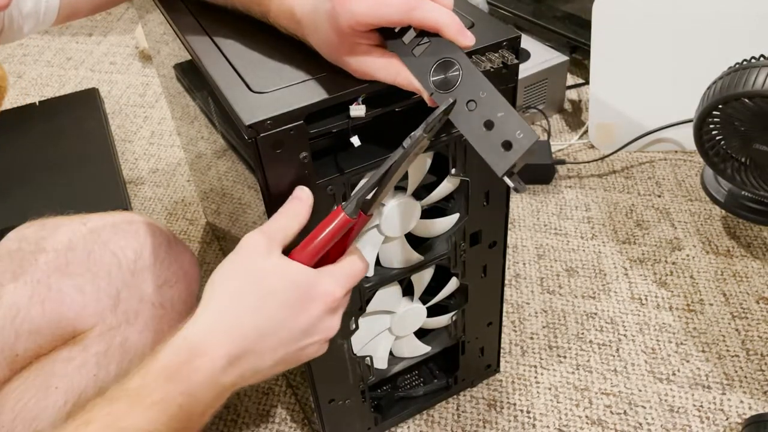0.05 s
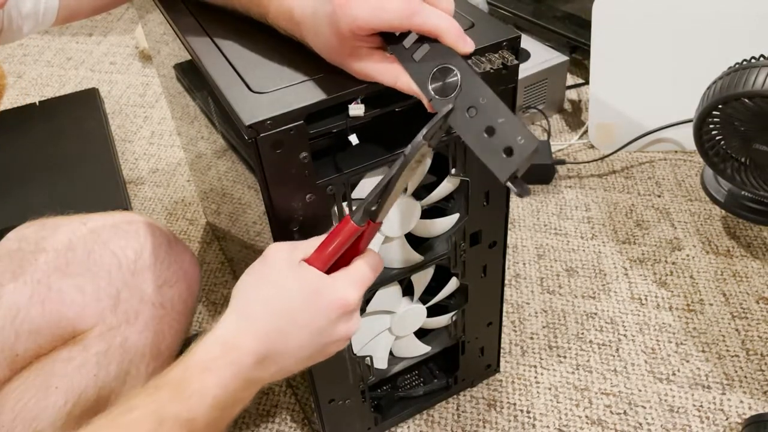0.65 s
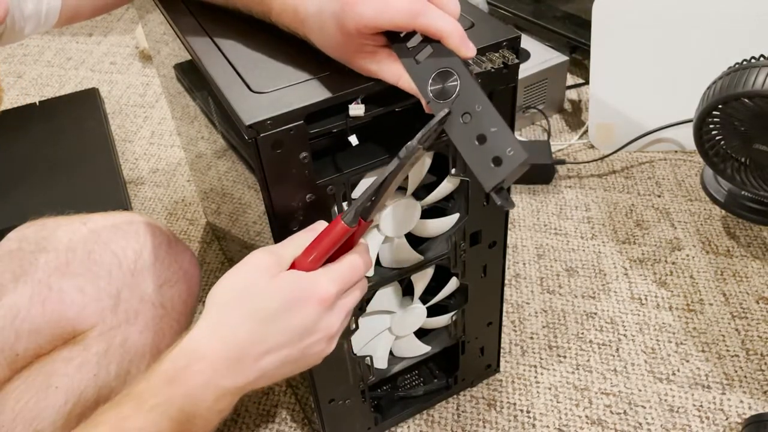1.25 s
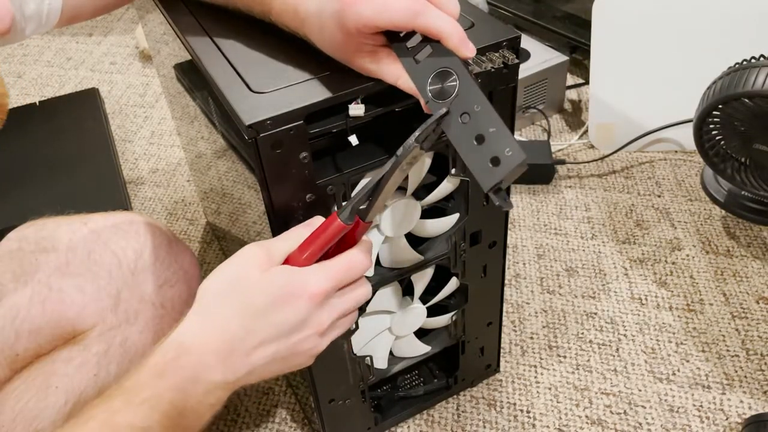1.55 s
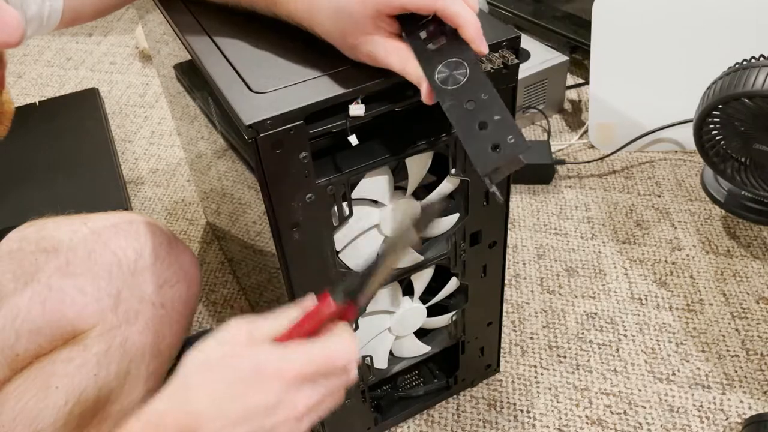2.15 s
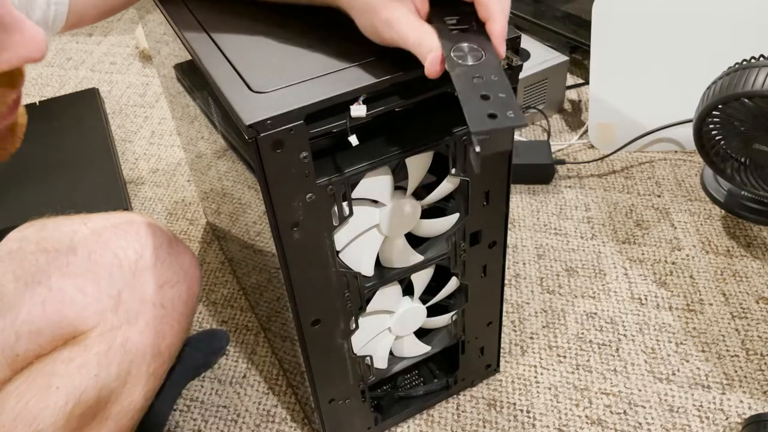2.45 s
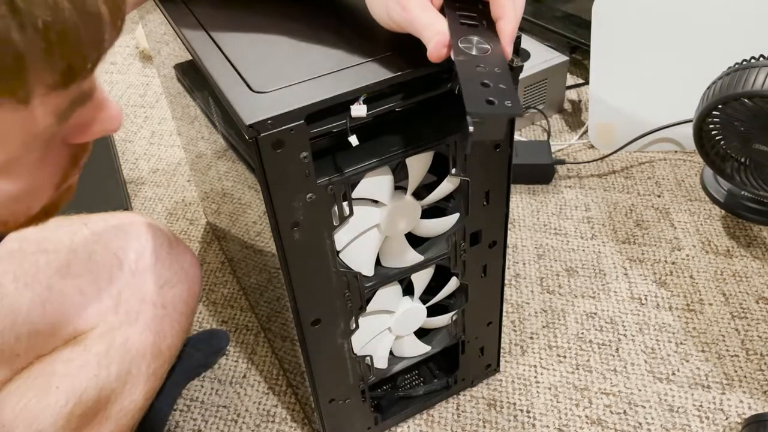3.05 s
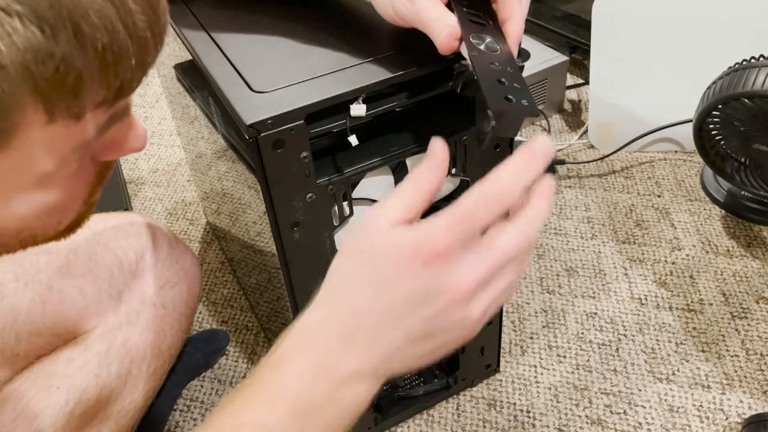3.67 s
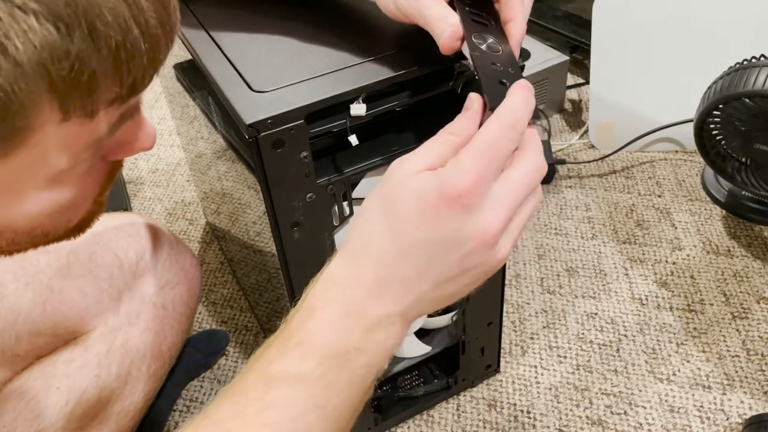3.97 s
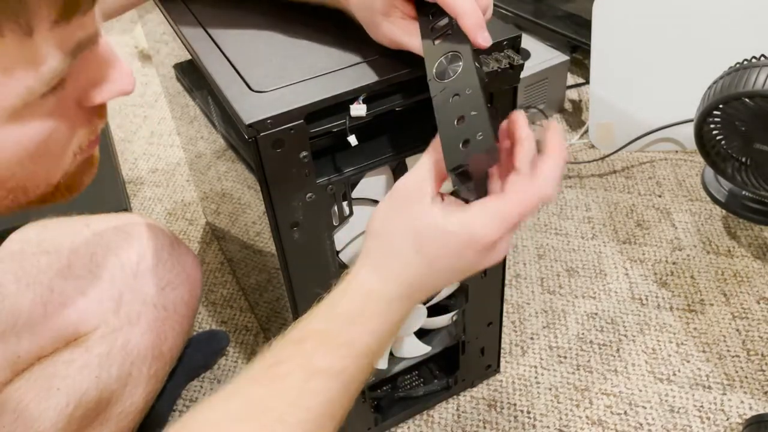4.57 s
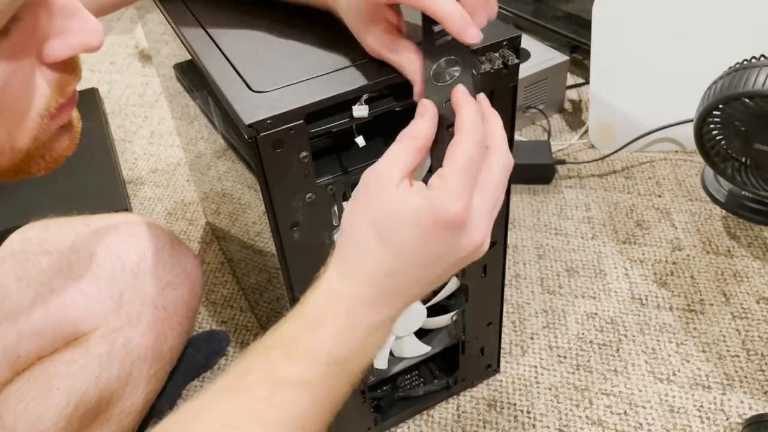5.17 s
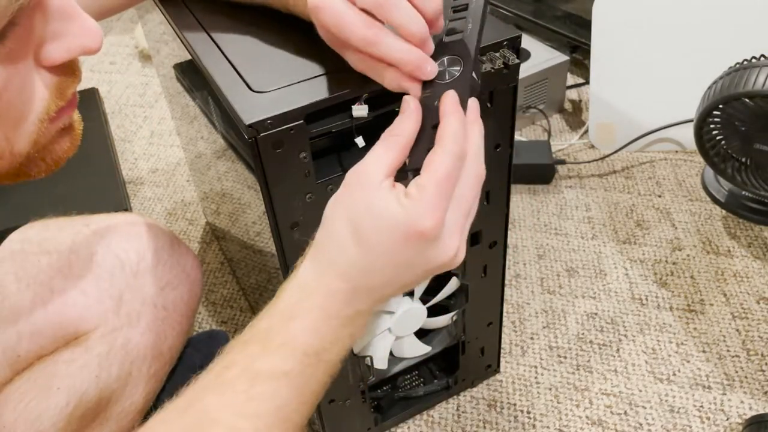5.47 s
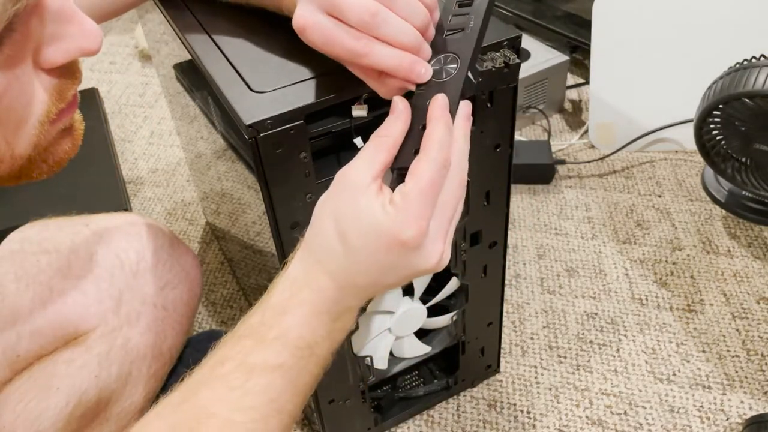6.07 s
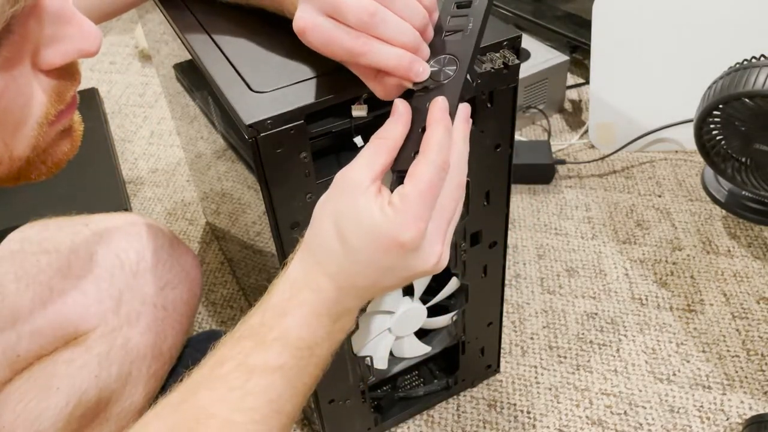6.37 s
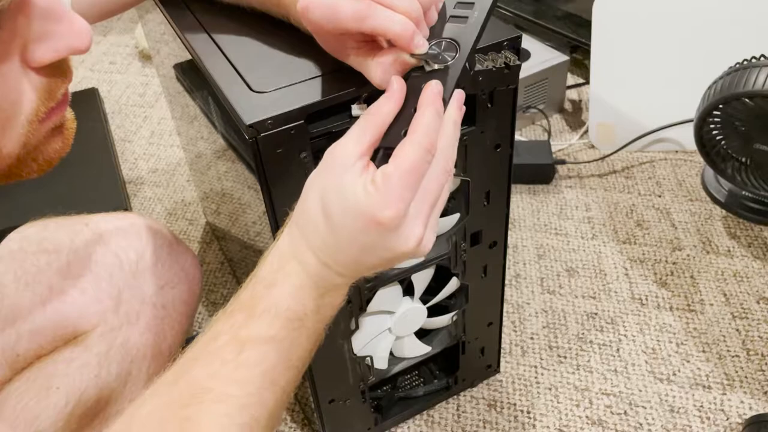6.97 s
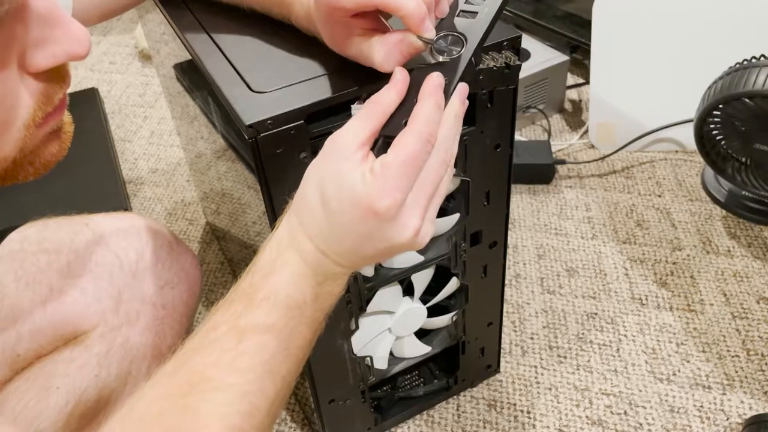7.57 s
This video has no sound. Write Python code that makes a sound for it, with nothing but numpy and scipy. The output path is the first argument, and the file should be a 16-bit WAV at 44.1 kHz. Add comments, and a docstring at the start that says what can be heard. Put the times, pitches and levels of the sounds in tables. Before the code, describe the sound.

Steel cutters bite through a plastic computer case panel with a very brief creak and one loud, sharp snap. The case thumps and the metal rings for a moment. A smaller crack follows. Then come faint ticks, scuffs and finger rubs as the loose strip is handled, with a few clearer clicks near the end. A fan hums quietly throughout, heard close up in a small carpeted room.

```python
"""Cutting a computer case's plastic panel

Steel cutters bite through the front panel in a small carpeted room. The plastic creaks and snaps,
the case thumps and the steel rings. Faint plastic ticks sound before and after the snap; knocks,
scuffs and finger rubs follow it. A fan hums throughout, a low rumble comes and goes, and the gain
ducks after the snap."""
import sys
import numpy as np
from scipy import signal
from scipy.fft import rfft, irfft
from scipy.io import wavfile
from scipy.ndimage import uniform_filter1d, minimum_filter1d

SR = 44100
rng = np.random.default_rng(int(sys.argv[2]) if len(sys.argv) > 2 else 0)


def transcribe(signal):
    """Save signal, clipped to [-1, 1], as a 16-bit WAV file at the path in sys.argv[1]."""
    frames = np.atleast_2d(signal).T
    limited = np.clip(frames, -1, 1)
    pcm = np.round(limited * 32767).astype(np.int16)
    wavfile.write(sys.argv[1], SR, pcm)


N = 345303
TIME_S, FREQ_HZ = np.arange(N) / SR, np.fft.rfftfreq(N, 1 / SR)
SNAP_S = 0.6508  # the jaws meet
BODY_HZ, SNAP_HZ, FIZZ_HZ = 760, 5460, 10984  # bands of a click


def amp(db):
    """Decibels to gain."""
    return 10 ** (np.asarray(db) / 20)


def unit_rms(x):
    """Scales to rms 1."""
    return x / np.sqrt(np.mean(x ** 2) + 1e-20)


def unit_hit(x):
    """Scales a short sound to the energy of 5 ms at rms 1."""
    return x * np.sqrt(SR * .005 / (np.sum(x ** 2) + 1e-20))


def curve(points, hz=FREQ_HZ):
    """Interpolates (Hz, value) points on a log-frequency axis."""
    point_hz, value = np.transpose(points)
    return np.interp(np.log(hz + 1), np.log(point_hz + 1), value)


def add(mix, start_s, sound):
    """Mixes a sound in at start_s."""
    part = mix[max(round(start_s * SR), 0):][:len(sound)]
    part += sound[:len(part)]


def colour(x, spectrum):
    """Filters a full-length signal by (Hz, dB) points."""
    return irfft(rfft(x) * amp(curve(spectrum)), N)


def pulse(spectrum_db):
    """Minimum-phase pulse with the given spectrum."""
    log_gain = np.log(amp(np.r_[spectrum_db, spectrum_db[-2:0:-1]]))
    return np.fft.ifft(np.exp(np.conj(signal.hilbert(log_gain)))).real


def drift(rate_hz, step=256):
    """Smooth random wander of rms 1, drawn every step samples."""
    count = N // step + 2
    hz = np.fft.rfftfreq(count, step / SR)
    slow = irfft(rfft(rng.standard_normal(count)) * np.exp(-(hz / rate_hz) ** 2), count)
    return unit_rms(np.interp(np.arange(N) / step, np.arange(count), slow))


def bump(middle_s, length_s):
    """Gaussian envelope of height 1."""
    return np.exp(-(2 * (TIME_S - middle_s) / length_s) ** 2)


def decay(t, t60):
    """Envelope that falls 60 dB in t60."""
    return np.exp(-np.log(1000) * t / t60)


def ring(modes):
    """Damped sines of a struck object."""
    t = TIME_S[:SR]
    return unit_hit(sum(amp(db) * decay(t, t60) * np.sin(2 * np.pi * (hz * t + rng.random()))
                        for hz, db, t60 in modes))


def fracture(decay_ms, break_ms=0.46, size=4096):
    """One sharp break and a dying shower of tiny cracks, whitened."""
    ms = np.arange(size) * 1000 / SR
    shower = rng.standard_normal(size) * (np.exp(-ms / decay_ms) + np.exp(-ms / break_ms))
    broad_db = 10 * np.log10(uniform_filter1d(abs(rfft(shower)) ** 2, size=51) + 1e-9)
    return signal.fftconvolve(shower, pulse(-broad_db))[:size]


# Base spectrum of a plastic click. Each row: frequency in Hz, gain in dB.
CLICK_SPECTRUM = [(100, -15.5), (300, -10.5), (900, 2), (3500, 5), (5000, 0), (7500, 5), (9500, 1),
                  (13500, -1.5), (16000, -15.5)]

def click(decay_ms, tone, ring_db, modes, size=2048):
    """A shower of tiny cracks, shaped by tone (Hz, dB), sets the plastic ringing."""
    hz = np.fft.rfftfreq(size, 1 / SR)
    out = amp(ring_db) * ring(modes)
    crack = pulse(curve(CLICK_SPECTRUM, hz) + curve(tone, hz))
    add(out, 0, unit_hit(signal.fftconvolve(fracture(decay_ms), crack)))
    return out


# Modes of the held panel. Each row: frequency in Hz, relative level in dB, T60 in seconds.
PANEL_MODES = [(1060, -9, .022), (1250, -15, .025), (1500, -4, .04), (2095, -2, .03), (2600, -12, .02),
               (4080, -1, .026), (4340, 4, .028), (4850, -3, .022), (5100, -3, .025), (6190, 1, .022),
               (6500, -5, .022), (7850, -6, .022), (10100, -1, .015), (12100, -4, .01)]
# Each row: start in seconds, level in dB, decay in ms, then body, fizz and ring in relative dB.
PANEL_CRACKS = [(0.6482, -10, 2.6, -8.5, 4.5, -9), (0.651, -15.5, 0.89, -8, -1.5, 2.5),
                (0.6528, -21, 0.74, -3, 0.5, 0.5), (1.2688, -25, 3, -5, 5, -8.5)]

def panel(clack_hz=1500, hollow_hz=3002):
    """The held panel cracks between the blades, with little bass and a lower clack than the strip."""
    out = np.zeros(N)
    for start_s, db, decay_ms, body_db, fizz_db, ring_db in PANEL_CRACKS:
        tone = [(350, body_db - 9.5), (BODY_HZ, body_db), (clack_hz, body_db + 2),
                (hollow_hz, -9.5), (SNAP_HZ, 0), (FIZZ_HZ, fizz_db)]
        add(out, start_s, amp(db) * click(decay_ms, tone, ring_db, PANEL_MODES))
    return out


# Straining plastic. Each row: frequency in Hz, gain in dB.
CREAK_SPECTRUM = [(1000, -36), (1800, -24), (3500, -17), (3800, -26), (4120, -7), (4700, -30), (5600, -7),
                  (5950, -14), (6400, 0), (7100, -2), (7700, -12), (8500, -38)]
# Modes of the steel cutters. Each row: frequency in Hz, relative level in dB, T60 in seconds.
CUTTER_MODES = [(3537, -6, .3), (4345, 0, .4), (4877, -6, .35), (6535, 3, .25)]

def cutters(bite_s=.6253, hard_slip_s=.6405, break_s=.648, slips_per_s=594, growth_s=.0056, ring_db=-28):
    """The blades stick and slip ever harder into the plastic; the steel rings as the jaws meet."""
    out = np.zeros(N)
    slip = pulse(curve(CREAK_SPECTRUM, np.fft.rfftfreq(4096, 1 / SR)))
    slip /= abs(slip).max()
    for slip_s in np.arange(bite_s, break_s, 1 / slips_per_s):
        is_hard = abs(slip_s - hard_slip_s) < .5 / slips_per_s
        force = amp(-7.5 + 6 * is_hard + rng.standard_normal()) * np.exp((slip_s - break_s) / growth_s)
        jitter_s = (rng.random() - .5) / slips_per_s
        add(out, slip_s + jitter_s, force * slip)
    add(out, SNAP_S, amp(ring_db) * ring(CUTTER_MODES))
    return out


# Each row: start in seconds, level in dB, first and last pitch in Hz, decay in ms.
CASE_THUMPS = [(0.6497, -11, 483.8, 60, 13), (3.0396, -49, 730, 221, 14)]

def case_thumps(sag_ms=4.5, rise_ms=1.0):
    """Short low thumps that quickly fall in pitch."""
    out = np.zeros(N)
    ms = np.arange(8192) * 1000 / SR
    for start_s, db, first_hz, last_hz, decay_ms in CASE_THUMPS:
        cycles = np.cumsum(last_hz + (first_hz - last_hz) * np.exp(-ms / sag_ms)) / SR
        envelope = (1 - np.exp(-ms / rise_ms)) * np.exp(-ms / decay_ms)
        add(out, start_s, amp(db) * unit_hit(envelope * np.sin(2 * np.pi * cycles)))
    return out


# Dense modes of the sheet steel. Each row: frequency in Hz, gain in dB.
WALL_SPECTRUM = [(500, -22.5), (1100, -14), (2100, -7.5), (3250, -7.5), (3600, -4.5), (4500, 3), (5600, -4),
                 (6600, 1), (8500, -12), (10000, -4), (13800, -7), (15500, -16.5)]
# Each row: frequency in Hz, T60 in seconds.
WALL_T60 = [(4500, .43), (12000, 0.34)]

def case_walls(level_db=-15.0, rise_s=0.0091):
    """The snap shakes the steel walls; their many modes die away as a hiss, the highest first."""
    hiss = unit_rms(colour(rng.standard_normal((2, N)), WALL_SPECTRUM))
    hz, frame_s, bands = signal.stft(hiss, SR, nperseg=256)
    bands *= decay(np.maximum(frame_s - SNAP_S, 0), curve(WALL_T60, hz)[:, None])
    onset = 1 - np.exp(-np.maximum(TIME_S - SNAP_S, 0) / rise_s)
    return amp(level_db) * onset * signal.istft(bands, SR, nperseg=256)[1][:, :N]


# Deep noise of the shudder and the background rumble. Each row: frequency in Hz, gain in dB.
DEEP_SPECTRUM = [(15, -27), (32, -13), (48, 4.5), (100, 1), (150, 0), (250, -17), (600, -51)]

def case_shudder(level_db=-36, t60_s=.3):
    """After the snap the whole case rumbles briefly on the carpet."""
    envelope = (TIME_S > SNAP_S) * decay(abs(TIME_S - SNAP_S), t60_s)
    return amp(level_db) * envelope * unit_rms(colour(rng.standard_normal(N), DEEP_SPECTRUM))


def contact(decay_ms, body_db, clack_db, fizz_db, ring_db, modes, clack_hz=2520):
    """One contact on the plastic."""
    tone = [(BODY_HZ, body_db), (clack_hz, clack_db), (SNAP_HZ, 0), (FIZZ_HZ, fizz_db)]
    return click(decay_ms, tone, ring_db, modes)


# Modes of the loose strip and of a tick. Each row: frequency in Hz, relative level in dB, T60 in seconds.
STRIP_MODES = [(720, 1, 0.028), (2370, 4, 0.014), (2760, -1, 0.022), (4000, -7, .02), (5018, -4, 0.02),
               (7600, -3, 0.015), (13200, 5, 0.004)]
TICK_MODES = [(3050, -6, .03), (3500, 0, .05), (5340, -6, .025)]
# Each row: start in seconds, level in dB, then body, fizz and ring in relative dB.
STRIP_KNOCKS = [(3.0403, -53, 9, 12, 7.5), (5.923, -50.5, 21, 4, -11), (6.192, -41, 20, 7.5, -9.5),
                (6.6953, -42, 11.5, 13, -6), (6.7077, -33.5, -0.5, 15.5, -25)]
# Each row: start in seconds, level in dB, fizz and ring in relative dB, pitch ratio of the ring.
PLASTIC_TICKS = [(0.159, -62.5, -4.5, -4, 0.96), (0.29, -66.5, -8, -1.5, 1.1), (1.2, -64.5, 3, -17, 1.3),
                 (2.059, -58, 3, -19, 1), (2.493, -63.5, 2.5, -7, 1.7), (2.623, -64, 7, -7.5, 1),
                 (4.3058, -62.5, -16.5, -7, 0.94), (4.744, -59, -1, -11, 1.1), (4.755, -62, -9, -2, .9),
                 (6.9702, -63.5, -8, 0.5, 1.04)]
# Each row: start in seconds, level in dB, decay in ms, then body, clack and fizz in relative dB.
STRIP_SCUFFS = [(3.048, -54, 46, 6, 10, -1), (3.822, -52, 46, 33, 14, -3.5)]

def handling(knock_ms=1.8, tick_ms=5, tick_body_db=-6.5, tick_clack_db=2, scuff_ring_db=-20):
    """Faint plastic ticks sound before and after the snap; knocks and scuffs follow it."""
    out = np.zeros(N)
    for start_s, db, body_db, fizz_db, ring_db in STRIP_KNOCKS:
        knock = contact(knock_ms, body_db, body_db + 2.5, fizz_db, ring_db, STRIP_MODES)
        add(out, start_s, amp(db) * knock)
    for start_s, db, fizz_db, ring_db, pitch in PLASTIC_TICKS:
        modes = [(hz * pitch, mode_db, t60) for hz, mode_db, t60 in TICK_MODES]
        tick = contact(tick_ms, tick_body_db, tick_clack_db, fizz_db, ring_db, modes)
        add(out, start_s, amp(db) * tick)
    for start_s, db, decay_ms, body_db, clack_db, fizz_db in STRIP_SCUFFS:
        scuff = contact(decay_ms, body_db, clack_db, fizz_db, scuff_ring_db, STRIP_MODES)
        add(out, start_s, amp(db) * scuff)
    return out


# Light and firm touch on plastic. Each row: frequency in Hz, gain in dB.
HISS_SPECTRUM = [(800, -27), (2500, 15.5), (4500, 9.5), (7300, 4), (10000, 12), (13500, 8.5), (15500, 4)]
SCRAPE_SPECTRUM = [(800, -28), (3000, -10), (4300, -3), (5200, 0), (6000, 2), (7200, 21), (9000, 8),
                   (15000, -8)]
# Each row: middle in seconds, length in seconds, level in dB.
FINGER_RUBS = [(1.124, 0.17, -71), (2.015, 0.15, -73.5), (3.265, 0.36, -75), (4.175, 0.31, -70),
               (4.468, 0.05, -61), (4.53, 0.041, -61), (4.887, 0.11, -71), (5.198, 0.1, -65.5),
               (5.35, 0.24, -75)]

def finger_rubs(slips_per_s=2500, catch_db=2.5, light_db=-79, firm_db=-51):
    """Skin slides over plastic in tiny slips; a firmer touch is louder and turns from hiss to scrape."""
    out = np.zeros(N)
    sizes = rng.choice([-1, 1], N) * np.minimum(rng.exponential(1, N), 5)
    slips = sizes * (rng.random(N) < slips_per_s / SR)
    slips *= amp(catch_db * drift(70))  # the skin catches and lets go
    hiss = unit_rms(colour(slips, HISS_SPECTRUM))
    scrape = unit_rms(colour(slips, SCRAPE_SPECTRUM))
    for middle_s, length_s, db in FINGER_RUBS:
        firmness = np.clip((db - light_db) / (firm_db - light_db), 0, 1)
        out += amp(db) * bump(middle_s, length_s) * ((1 - firmness) * hiss + firmness * scrape)
    return out


# Each row: middle in seconds, length in seconds, pitch in Hz, level in dB.
FINGER_SQUEAKS = [(4.534, 0.028, 7140, -66), (4.9, 0.051, 5180, -76), (5.217, .04, 4260, -73)]

def finger_squeaks(width_hz=280):
    """A fingertip catches and briefly sings one unsteady note."""
    waver = drift(width_hz, step=32) + 1j * drift(width_hz, step=32)
    return sum(amp(db) * bump(middle_s, length_s) * (waver * np.exp(2j * np.pi * hz * TIME_S)).real
               for middle_s, length_s, hz, db in FINGER_SQUEAKS)


# The room's tail. Each row: frequency in Hz, gain in dB.
ROOM_SPECTRUM = [(100, -14), (600, -6.5), (1500, 1), (4500, 2.5), (6500, 1.5), (8700, -11.5), (13500, -2),
                 (15500, -17)]
# Each row: frequency in Hz, T60 in seconds.
ROOM_T60 = [(100, .12), (500, .15), (2500, .27), (5000, .36), (13000, .33)]

def room(x, tail_db=-14, early_db=-7, early_decay_s=0.0084):
    """Quick reflections off the case, then the room's tail, each band dying at its own rate."""
    t = TIME_S[:SR]
    hz, frame_s, bands = signal.stft(rng.standard_normal((2, SR)), SR, nperseg=256)
    bands *= amp(curve(ROOM_SPECTRUM, hz))[:, None] * decay(frame_s, curve(ROOM_T60, hz)[:, None])
    tail = signal.istft(bands, SR, nperseg=256)[1][:, :SR] * np.clip(t / 0.0082 - .5, 0, 1)
    echoes = rng.standard_normal((2, SR)) * (rng.random((2, SR)) < .1)
    early = echoes * (t > .002) * np.exp(-t / early_decay_s)
    response = sum(amp(db) * part / np.linalg.norm(part, axis=1, keepdims=True)
                   for db, part in [(tail_db, tail), (early_db, early)])
    return signal.fftconvolve(x[None], response, axes=1)[:, :N]


# Room air and fan rush. Each row: frequency in Hz, gain in dB.
RUSH_SPECTRUM = [(15, -45), (32, -30.5), (55, -14.5), (100, -15.5), (200, -15.5), (320, -2.5), (410, -11),
                 (560, -10.5), (900, -6.5), (1150, -10.5), (3800, -29.5), (6700, -33), (8700, -39),
                 (14200, -38.5), (15300, -67.5)]
# Each row: frequency in Hz, left-right correlation.
RUSH_CORRELATION = [(60, 0.24), (290, 0.95), (900, 0.69), (2500, 0.31), (7000, 0.22), (12000, 0.16)]

def fan_rush(level_db=-59.0):
    """Moving air, heard partly direct and partly scattered by the room."""
    direct, scattered = rfft(rng.standard_normal((2, N)))
    correlation = curve(RUSH_CORRELATION)
    right = correlation * direct + np.sqrt(1 - correlation ** 2) * scattered
    pair = irfft(np.array([direct, right]), N)
    return amp(level_db) * unit_rms(colour(pair, RUSH_SPECTRUM))


# Each row: frequency in Hz, relative level in dB, share of the swell and dip.
FAN_TONES = [(290.7, -74.5, 0.67), (336.4, -63, 0.82), (455.4, -69, 0.12), (922, -78, 0.15)]

def fan_hum(gain_db=-4.0, wander=0.0012, flutter_db=.7, swell_db=9.5, dip_db=-13):
    """Tones of near-steady pitch; the lower ones most of all swell once, and the hum dips briefly near 1.3 s."""
    contour_db = swell_db * bump(middle_s=2.5, length_s=6.2) + dip_db * bump(middle_s=1.3, length_s=0.31)
    clock_s = np.cumsum(1 + wander * drift(1.7)) / SR
    tones = sum(amp(db + share * contour_db + flutter_db * drift(2)) * np.sin(2 * np.pi * hz * clock_s)
                for hz, db, share in FAN_TONES)
    return np.sqrt(2) * amp(gain_db) * tones


def fan(ripple_db=1.5, left_lead_s=.00043, hum_lean_db=6):
    """The fan stands to the left; standing waves ripple the spectrum of its rush."""
    ripple = unit_rms(uniform_filter1d(rng.standard_normal(len(FREQ_HZ)), size=500))
    ripple *= np.clip(FREQ_HZ / 2500, 0, 1)
    rush = rfft(fan_rush()) * amp(ripple_db * ripple)
    hum = rfft(fan_hum()) * amp([[hum_lean_db / 2], [-hum_lean_db / 2]])
    left, right = rush + hum
    delay = np.exp(-2j * np.pi * FREQ_HZ * left_lead_s)
    return irfft(np.array([left, right * delay]), N)


# Mains hum. Each row: frequency in Hz, level in dB relative to the deep noise.
MAINS_TONES = [(60, -11), (120, -7), (182, -5.5), (242, -3)]
# Upper part of the rumble. Each row: frequency in Hz, gain in dB.
UPPER_SPECTRUM = [(50, -33), (130, -12), (185, 8), (250, -4), (310, 5), (420, -11.5), (800, -51)]
# Each row: start, end and fade in seconds, then deep and upper gain in dB.
RUMBLE_SPELLS = [(0, 1.109, 0.013, -67.5, -67), (3.013, 3.2, 0.032, -76, -89),
                 (4.546, 5.293, 0.021, -98, -67.5), (6.495, 7.794, 0.31, -64, -63)]

def rumble(floor_deep_db=-82, floor_upper_db=-77, wander=0.00779):
    """Low noise with a wavering mains hum in it, rising in spells above a faint floor."""
    mains = sum(amp(db) * np.sin(2 * np.pi * np.cumsum(hz * (1 + wander * drift(5.6))) / SR)
                for hz, db in MAINS_TONES)
    deep = unit_rms(colour(rng.standard_normal(N), DEEP_SPECTRUM)) + np.sqrt(2) * mains
    upper = unit_rms(colour(rng.standard_normal(N), UPPER_SPECTRUM))
    out = amp(floor_deep_db) * deep + amp(floor_upper_db) * upper
    for start_s, end_s, fade_s, deep_db, upper_db in RUMBLE_SPELLS:
        rise = np.tanh((TIME_S - start_s) / (2 * fade_s))
        fall = np.tanh((TIME_S - end_s) / (2 * fade_s))
        out += (rise - fall) / 2 * (amp(deep_db) * deep + amp(upper_db) * upper)
    return out


# Each row: frequency in Hz, phase lead of the left port in radians.
PORT_PHASE = [(300, .1), (1500, .3), (3700, 1.4), (5000, .9), (6000, -.8), (8000, -3.1), (10000, -4.1),
              (14000, -6.28)]

def mic_ports(x):
    """Direct sound reaches the two microphone ports with a phase difference."""
    half_shift = np.exp(.5j * curve(PORT_PHASE))
    return irfft(rfft(x) * np.array([half_shift, half_shift.conj()]), N)


def scene():
    """The work on the panel, the shaken case, reflections and background, in stereo."""
    work = panel() + handling() + cutters() + finger_rubs() + finger_squeaks()
    direct = mic_ports(work + case_thumps() + case_shudder())
    return direct + case_walls() + room(work) + fan() + rumble()


def gain_control(x, threshold_db=-28, slope=.66, hold_s=.1, recover_db_per_s=135, lag_s=.016):
    """The gain sinks just after a loud sound, holds and comes back."""
    power_db = 10 * np.log10(abs(uniform_filter1d((x ** 2).mean(0), size=400)) + 1e-12)
    half_hold = round(hold_s * SR / 2)
    held_db = -minimum_filter1d(-power_db, 2 * half_hold + 1, origin=half_hold)
    fall_db = TIME_S * recover_db_per_s
    detector_db = np.maximum.accumulate(held_db + fall_db) - fall_db
    over_db = np.maximum(detector_db - threshold_db, 0)
    pole = np.exp(-1 / (lag_s * SR))
    return x * amp(-slope * signal.lfilter([1 - pole], [1, -pole], over_db))


# Each row: frequency in Hz, left minus right level in dB.
PORT_BALANCE = [(100, 2), (1200, 2.5), (2200, 0.5), (5000, 5), (7000, 2), (9000, 0)]

def record(dry, ceiling=.8, cutoff_hz=15900):
    """The left port is a little louder; then gain control, soft overload and a low-pass."""
    lean_db = curve(PORT_BALANCE) / 2
    heard = irfft(rfft(dry) * amp([lean_db, -lean_db]), N)
    limited = ceiling * np.tanh(gain_control(heard) / ceiling)
    lowpass = signal.firwin(255, cutoff_hz, window=("kaiser", 9), fs=SR)
    return signal.oaconvolve(limited, lowpass[None], "same")


dry = scene()
out = record(dry)
transcribe(out)
```